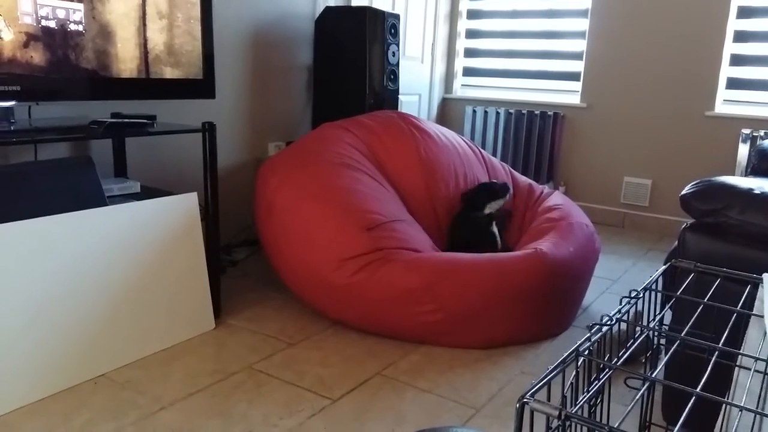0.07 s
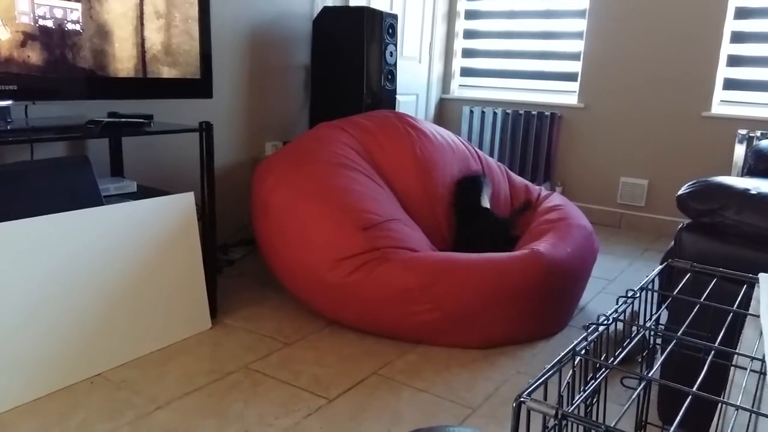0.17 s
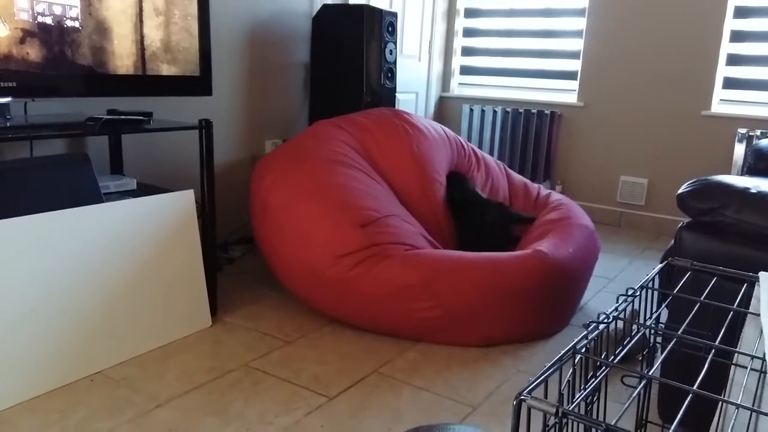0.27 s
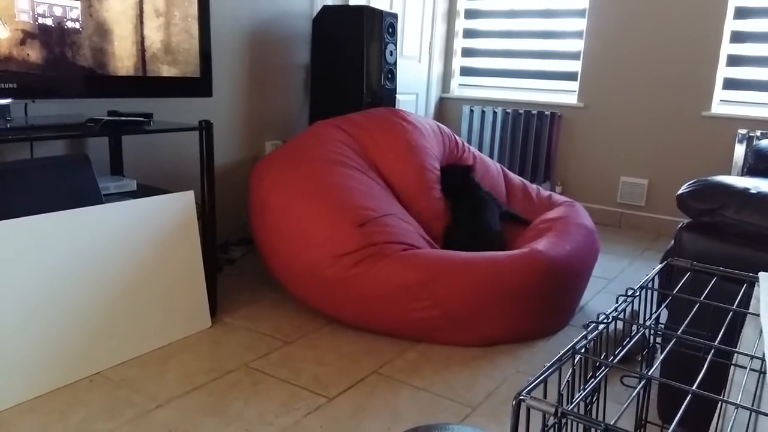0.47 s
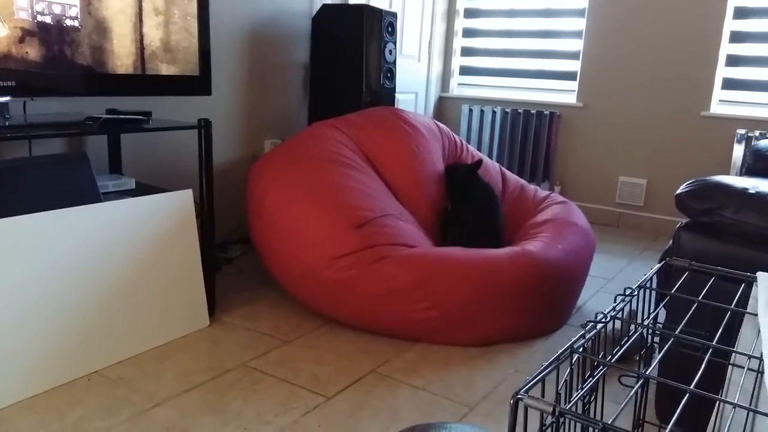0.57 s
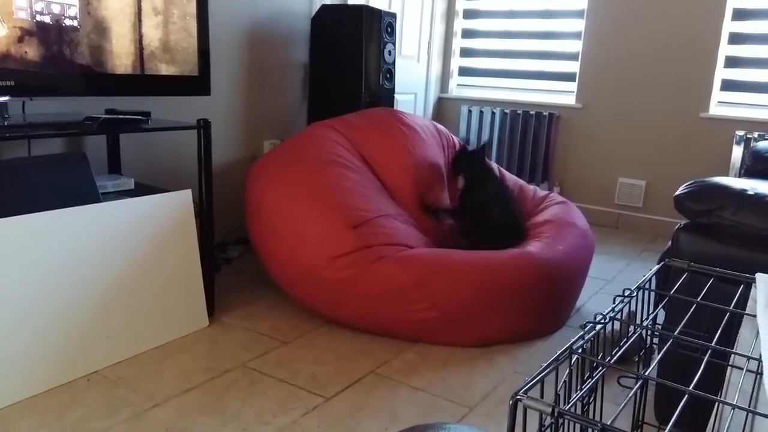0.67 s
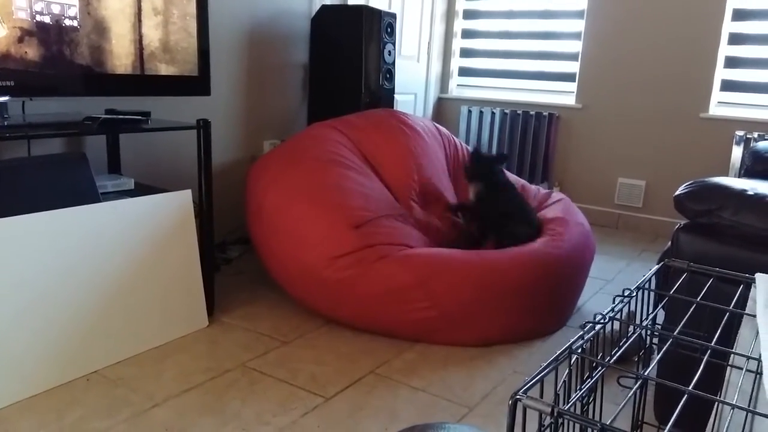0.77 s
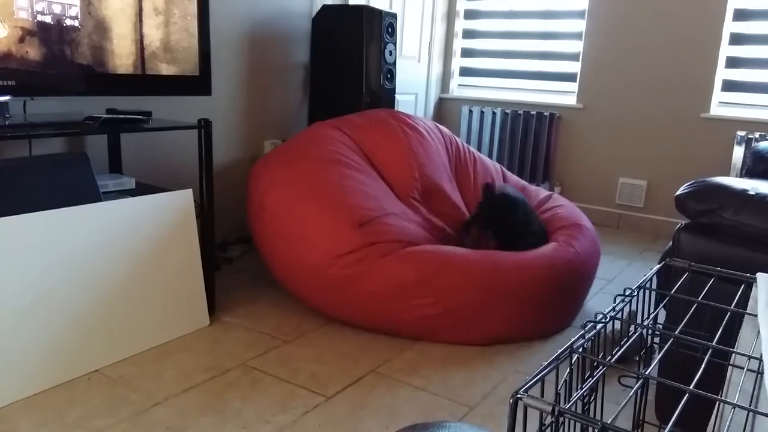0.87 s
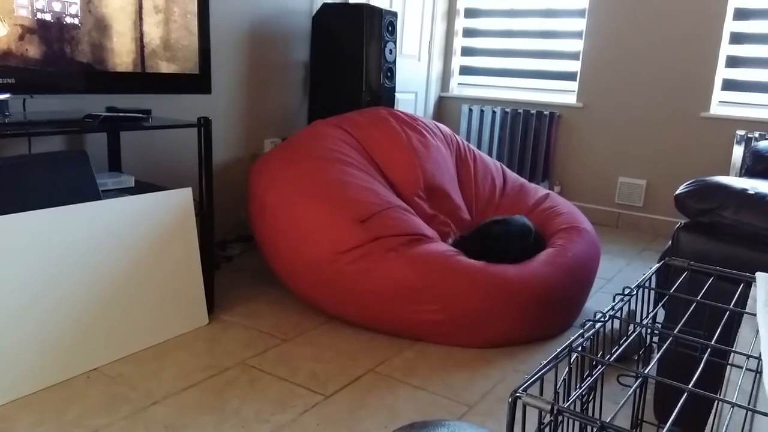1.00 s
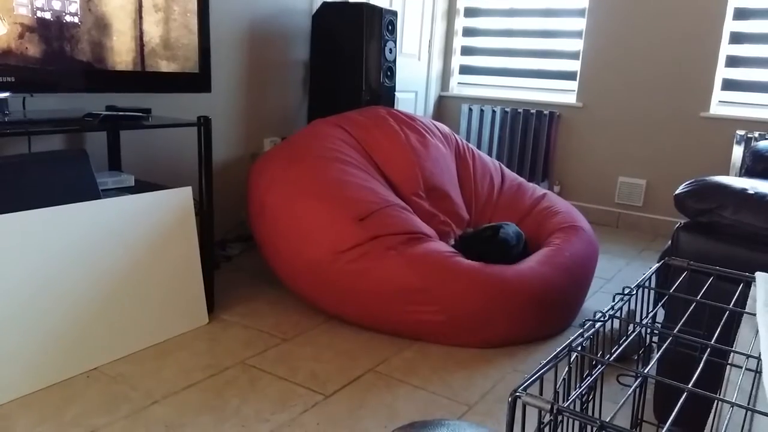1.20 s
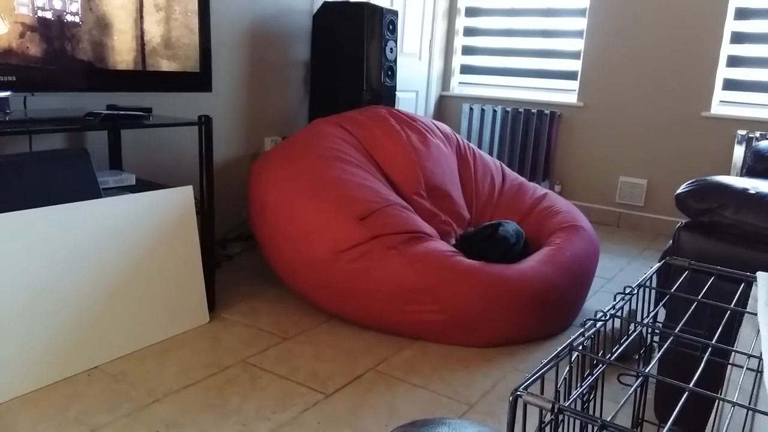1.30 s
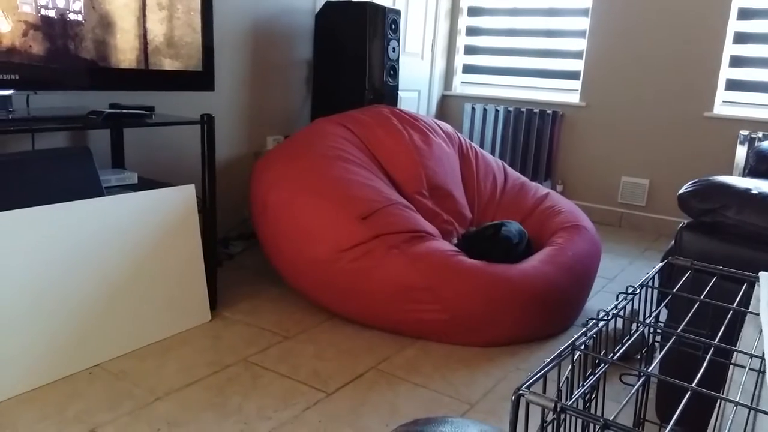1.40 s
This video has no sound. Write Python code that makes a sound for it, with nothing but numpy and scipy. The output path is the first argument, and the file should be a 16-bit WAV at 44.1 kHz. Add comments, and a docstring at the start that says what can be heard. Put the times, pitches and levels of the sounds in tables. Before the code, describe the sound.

After a brief near-quiet, a cat lands on a beanbag with a short scratchy zip and soft thump; foam beads crunch and hiss, fabric slides and flaps, then fades in a small quiet room, heard in stereo.

```python
"""Cat pouncing on a beanbag

A cat pounces about on a beanbag in a quiet tiled room. Random ticks and noise make the hissing foam beads,
fading sine waves make the paw thuds and sags, and a sine with a racing pitch makes the claw's zip.
Swells and bursts of noise make the sliding body and snapping folds, and the beads settle at the end.
Fading noise makes the room answer the paws and the claw, over a faint low rumble."""
import sys
import numpy as np
from scipy import signal
from scipy.fft import rfft, irfft, next_fast_len
from scipy.io import wavfile
from scipy.ndimage import uniform_filter1d, map_coordinates

SR = 44100
rng = np.random.default_rng(int(sys.argv[2]) if len(sys.argv) > 2 else 0)


def inscribe(sig):
    """Save sig as 16-bit PCM at rate SR to the path in sys.argv[1].

    A 1-D sig is mono; a 2-D sig holds one channel per row.
    Samples are clipped to [-1, 1] before scaling.
    """
    pcm = np.round(np.clip(np.atleast_2d(sig).T, -1, 1) * 32767)
    wavfile.write(sys.argv[1], SR, pcm.astype(np.int16))


N = 63945


def amp(db):
    """Turn decibels into a gain."""
    return 10 ** (np.asarray(db) / 20)


def unit(x):
    """Scale a signal to an rms (average strength) of 1."""
    return x / np.sqrt(np.mean(x ** 2) + 1e-20)


def along(points, hz):
    """Read a curve of (Hz, value) points, with frequency on a log axis."""
    point_hz, values = np.transpose(points)
    return np.interp(np.log(hz + 1), np.log(point_hz + 1), values)


def clock():
    """The time of every sample in seconds."""
    return np.arange(N) / SR


def curves(rows):
    """Join the rows with straight lines: one curve for each column after the time."""
    seconds, *columns = np.transpose(rows)
    return [np.interp(clock(), seconds, column) for column in columns]


def wobble(rate):
    """A smooth random curve through `rate` random points a second."""
    return map_coordinates(rng.standard_normal(N), [clock() * rate], mode="mirror")


def filtered(x, response):
    """Multiply the spectrum of x by a gain that depends on frequency."""
    size = next_fast_len(N + SR // 2)  # spare room at the end, so little wraps round
    gain = response(np.fft.rfftfreq(size, 1 / SR))
    return irfft(rfft(x, size) * gain, size)[..., :N]


# How alike the left and right sides are in sound that comes from all around.
# Each row: frequency in Hz, likeness (1 is identical, 0 is unrelated).
ALIKE = [(60, .96), (160, 0.95), (280, 0.9), (500, 0.74), (1000, 0.23), (2000, -0.064), (4000, 0.13),
         (12000, -0.094)]


def spread(pair):
    """Blend two unrelated signals into left and right: alike in the bass, nearly unrelated in the treble."""
    def shares(hz):
        turn = np.arccos(np.clip(along(ALIKE, hz), -1, 1)) / 2
        return np.array([np.cos(turn), np.sin(turn)])

    mid, side = filtered(pair, shares)
    return np.array([mid + side, mid - side])


def coloured(pair, spectrum):
    """Give a pair of signals a tone colour, spread it over left and right and set its rms to 1."""
    return unit(spread(filtered(pair, lambda hz: amp(along(spectrum, hz)))))


def rush(spectrum):
    """Steady stereo noise of the given colour, rms 1."""
    return coloured(rng.standard_normal((2, N)), spectrum)


PATCH_DB = 1.5  # typical size of the random gain changes


def patchy(pair):
    """Make noise uneven with brief, narrow patches of random gain, as different creases or beads rub."""
    grid = signal.stft(pair, nperseg=512)[2]
    field = rng.standard_normal(grid.shape[1:])
    field = uniform_filter1d(field, size=5, axis=0)  # smooth over neighbouring pitches
    field = uniform_filter1d(field, size=3, axis=1)  # smooth over neighbouring moments
    uneven = signal.istft(grid * amp(PATCH_DB * unit(field)), nperseg=512)[1]
    return unit(uneven[:, :N])


# How fast echoes die away in the room.
# Each row: frequency in Hz, time in seconds to fall by 60 dB.
ROOM = [(100, 0.4), (500, 0.16), (3000, 0.46), (12000, 0.16)]


def room(x):
    """The room's answer: many dense echoes, made as noise that fades at its own speed for each pitch."""
    hz, seconds, noise = signal.stft(rng.standard_normal((2, N)), SR, nperseg=256)
    fade = amp(-60 * seconds / along(ROOM, hz)[:, None])
    tail = spread(signal.istft(noise * fade, SR, nperseg=256)[1][:, :N])
    tail = tail / np.linalg.norm(tail[0])
    late = np.pad(x, (SR // 200, 0))  # the echoes start 5 ms after the sound
    return signal.fftconvolve(late[None], tail, axes=1)[:, :N]


def ring(start, hz, attack, t60):
    """One softly started sine that begins at `start` and falls by 60 dB in t60 seconds."""
    age = np.maximum(clock() - start, 0)
    rise = 1 - np.exp(-(age / attack) ** 2)
    return -np.sin(2 * np.pi * hz * age) * amp(-60 * age / t60) * rise


# How hard the filling is stirred. Each row: time in seconds, strength in relative dB.
STIR = [(0.0, -51), (0.168, -51), (0.222, -42.5), (0.226, -37), (0.326, -41.5), (0.44, -39.5),
        (0.548, -41.5), (0.576, -37.5), (0.612, -36.5), (0.626, -34.5), (0.706, -38.5), (0.988, -39),
        (1.074, -36.5), (1.336, -54.5), (1.45, -60)]
# Tone colour of the bead rustle. Each row: frequency in Hz, relative level in dB per Hz.
BEADS = [(30, -37), (180, -8.5), (330, -3), (490, -9.5), (680, -5), (1250, -4), (1430, -6.5), (1650, -4),
         (2400, -5.5), (3300, -10.5), (4250, -11), (4900, -17), (6150, -17.5), (7400, -25.5), (9000, -30.5),
         (12000, -39), (15700, -42)]
# Tone colour of the crunch of beads packing deep in the bag.
# Each row: frequency in Hz, relative level in dB per Hz.
CRUNCH = [(200, -14), (500, -8), (800, 2.5), (1300, -9), (2500, -13), (8000, -50)]
# Tone colour of the cover heaving with the filling.
# Each row: frequency in Hz, relative level in dB per Hz.
HEAVE = [(25, -52), (40, -27), (55, -10.5), (76, -5), (98, -11), (125, -7.5), (152, 0), (180, -3), (210, 0),
         (255, -8.5), (320, -14.5), (500, -30), (1200, -47.5)]
BEAD_DB, CRUNCH_DB = 9, -5  # added to the stirring
BEADS_PER_S, BEAD_SCATTER_DB = 14000, 1.5  # ticks a second in each signal, spread of their loudness
FLUTTER_DB, FLUTTERS_PER_S = 0.03, 150  # a very slight unsteadiness of the rustle
HARD_DB = -40.5  # at this stirring the treble keeps its plain colour
BRIGHTENS, BRIGHT_HZ = 0.27, 4970  # extra treble dB for each dB of stirring, where the treble begins
HEAVE_GROWS = 1.06  # dB of heaving for each dB of stirring
CRUNCH_LAG_S = 0.065


def filling():
    """Slipping beads make tiny ticks, brighter when stirred harder; a deeper crunch lags, the cover heaves."""
    stir_db, = curves(STIR)
    slips = rng.random((2, N)) < BEADS_PER_S / SR
    signs = rng.choice([-1, 1], (2, N))
    tick_db = BEAD_SCATTER_DB * np.minimum(rng.exponential(size=(2, N)), 5)
    beads = patchy(coloured(slips * signs * amp(tick_db), BEADS))

    treble = filtered(beads, lambda hz: hz ** 2 / (hz ** 2 + BRIGHT_HZ ** 2))
    beads = beads + treble * (amp(BRIGHTENS * (stir_db - HARD_DB)) - 1)
    rustle = beads * amp(stir_db + BEAD_DB + FLUTTER_DB * wobble(FLUTTERS_PER_S))

    late_stir_db = np.interp(clock() - CRUNCH_LAG_S, clock(), stir_db)
    crunch = patchy(rush(CRUNCH)) * amp(CRUNCH_DB + late_stir_db)
    heave = rush(HEAVE) * amp(HARD_DB + HEAVE_GROWS * (stir_db - HARD_DB))
    return rustle + crunch + heave


# Tone colour of the room's faint rumble. Each row: frequency in Hz, relative level in dB per Hz.
AIR = [(25, -31), (50, -23), (75, -7), (100, 9), (125, -20), (210, -0.5), (320, -14), (800, -45),
       (2000, -16), (6000, -52), (15000, -45)]
AIR_DB = -52


def air():
    """The quiet room's air: steady noise, mostly a low rumble."""
    return amp(AIR_DB) * rush(AIR)


# A claw speeding over the weave. Each row: time in seconds, threads a second before jitter, level in dB.
CLAW = [(.208, 800, -72), (.217, 1300, -43), (.2245, 2400, -33), (.2285, 4100, -30), (.237, 3800, -55),
        (.25, 2900, -74)]
CLAW_JITTER, CLAW_ROOM_DB = 0.055, 4.5  # random share of the thread rate, room against direct sound


def claw():
    """Each thread plucked is one cycle of a sine: a short, rough zip that races up, then slows as it fades."""
    rate, db = curves(CLAW)
    rough_rate = rate * (1 + CLAW_JITTER * wobble(1500))
    zip_sound = amp(db) * np.sin(2 * np.pi * np.cumsum(rough_rate) / SR)
    zip_sound = zip_sound * (clock() > CLAW[0][0]) * (clock() < CLAW[-1][0])
    return zip_sound + amp(CLAW_ROOM_DB) * room(zip_sound)


# Paws landing. Each row: start in seconds, strength in relative dB, attack in seconds,
# dullness in dB lost per octave going up, factor on the bag's ringing times.
PAWS = [(0.2384, -14, 0.0059, 2, 1), (0.2567, -25, 0.0027, 6, 0.93), (0.313, -24, 0.01, 4, 0.56),
        (0.401, -35, 0.0081, 12, 1), (0.54, -29.5, 0.0023, 22, 0.84), (0.59, -31.5, .006, 37, 0.81),
        (0.625, -16, 0.0067, 12, 0.68), (0.6666, -30, 0.0066, 23, 0.86), (.733, -32, 0.0028, 11, 0.63),
        (1.062, -25.5, 0.0083, -3, 0.9)]
# The bag's dull ring. Each row: frequency in Hz, relative level in dB,
# time in seconds to fall by 60 dB before the paw's factor.
BAG = [(149.7, -3.5, 0.19), (204.7, 5.5, 0.11), (240, 2, 0.16), (351.4, -8, 0.12), (487.2, -11.5, 0.14),
       (784, -14, 0.25)]
# The whole bag sagging under the cat's weight. Each row: start in seconds, level in dB before the soft start.
SAGS = [(.245, -34), (.43, -43), (0.564, -32), (0.778, -33), (0.984, -39), (1.052, -40)]
PAW_ROOM_DB, PAW_LOW_HZ = -11, 105  # room against direct thud, below this the thuds are thinned
SAG_HZ, SAG_ATTACK_S, SAG_T60_S = 75.8, 0.014, 0.24


def paws():
    """Each landing rings the bag briefly, duller where the paw sinks deeper; the whole bag sags under the weight."""
    thuds = np.zeros(N)
    for start, db, attack, dull, decay in PAWS:
        for hz, level, t60 in BAG:
            octaves_up = np.log2(hz / BAG[1][0])  # counted from the bag's second tone
            thuds += amp(db + level - dull * octaves_up) * ring(start, hz, attack, t60 * decay)
    thuds = filtered(thuds, lambda hz: 1 - np.exp(-(hz / PAW_LOW_HZ) ** 4))
    sags = sum(amp(db) * ring(start, SAG_HZ, SAG_ATTACK_S, SAG_T60_S) for start, db in SAGS)
    return thuds + amp(PAW_ROOM_DB) * room(thuds) + sags


# The body sliding on the cover.
# Each row: time of the peak in seconds, rise in seconds, fall in seconds, level in dB.
SLIDES = [(.445, 0.038, 0.068, -28.5), (.79, 0.016, .03, -35.5), (1.065, 0.059, 0.034, -31),
          (1.34, 0.013, 0.017, -49.5)]
# Tone colour of the sliding cloth. Each row: frequency in Hz, relative level in dB per Hz.
CLOTH = [(30, -55), (200, -30), (700, -11), (1300, -0.5), (2300, 1.5), (3200, -9.5), (5000, -38),
         (15000, -65.5)]


def slides():
    """Fur swishes along the cloth: patchy noise in smooth swells."""
    t = clock()
    swell = np.zeros(N)
    for peak, rise, fall, db in SLIDES:
        width = np.where(t < peak, rise, fall)
        swell += amp(db) * np.exp(-0.5 * ((t - peak) / width) ** 2)
    return swell * patchy(rush(CLOTH))


# Folds of the cover snapping over. Each row: start in seconds, strength of the scuff in dB.
FOLDS = [(0.61, -37.5), (0.665, -27), (1.006, -37), (1.055, -30.5), (1.134, -34.5)]
# Tone colour of the folds. Each row: frequency in Hz, relative level in dB per Hz.
FOLD = [(30, -50), (150, -23), (400, -1.5), (850, 6.5), (1600, -5), (3000, -18), (7000, -39), (12000, -55)]
SCUFF_T60_S, SNAP_T60_S = 0.1, 0.0075  # times to fall by 60 dB
SNAP_DB = 7.5  # snap against scuff


def folds():
    """A few folds flip over: each is a noise burst with a quick dull snap and a longer scuff."""
    t = clock()
    strength = np.zeros(N)
    for start, db in FOLDS:
        age = np.abs(t - start)
        scuff = amp(-60 * age / SCUFF_T60_S)
        snap = amp(SNAP_DB - 60 * age / SNAP_T60_S)
        strength += (t > start) * amp(db) * (scuff + snap)
    bursts = rng.standard_normal((2, N)) * strength
    return np.std(bursts) * coloured(bursts, FOLD)  # colour it, keep its overall strength


# How the sound leans to one side. Each row: frequency in Hz, left over right in dB.
LEAN = [(60, -2.5), (99, 2.5), (160, 0.5), (270, -2), (450, -0.5), (740, -1), (1220, 0), (2010, -3.5),
        (3330, -6.5), (5500, 6.5), (9080, 5), (15000, 2.5)]


def scene():
    """The beanbag and the room's air, each pitch leaning a little to one microphone or the other."""
    sound = filling() + air() + claw() + paws() + slides() + folds()
    return filtered(sound, lambda hz: amp(np.outer([0.5, -0.5], along(LEAN, hz))))


TOP_HZ = 15780


def record(dry):
    """The recorder keeps nothing above its band limit."""
    return filtered(dry, lambda hz: hz < TOP_HZ)


dry = scene()
out = record(dry)
inscribe(out)
```